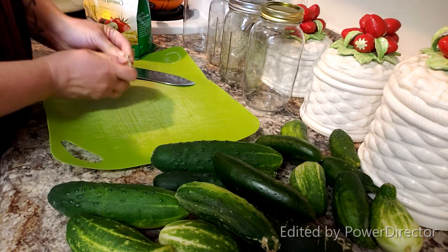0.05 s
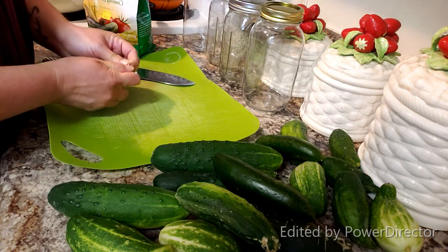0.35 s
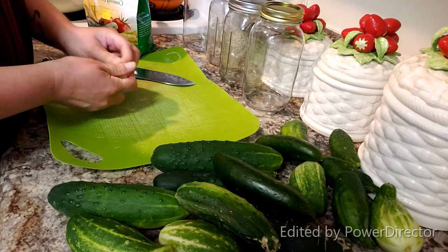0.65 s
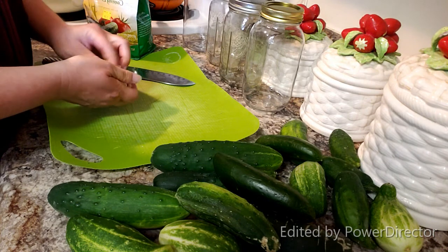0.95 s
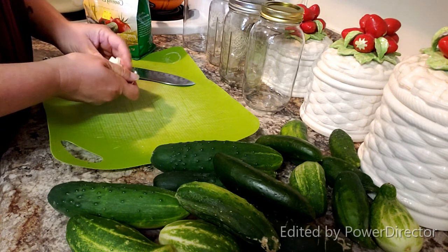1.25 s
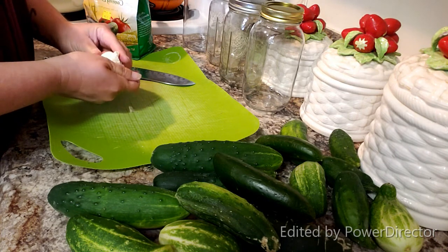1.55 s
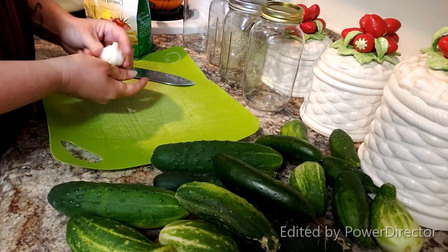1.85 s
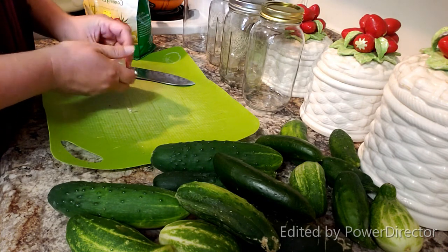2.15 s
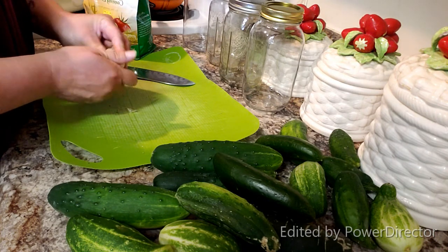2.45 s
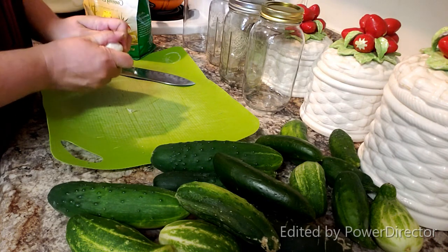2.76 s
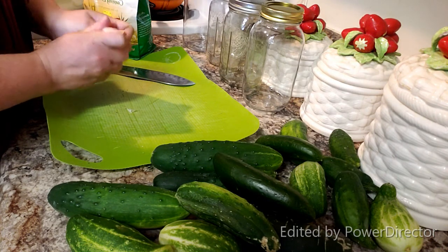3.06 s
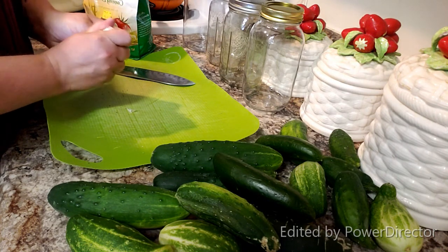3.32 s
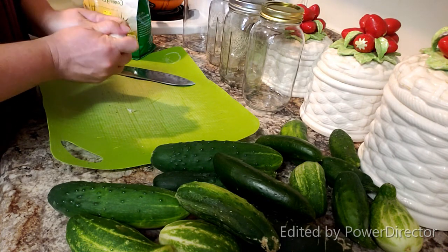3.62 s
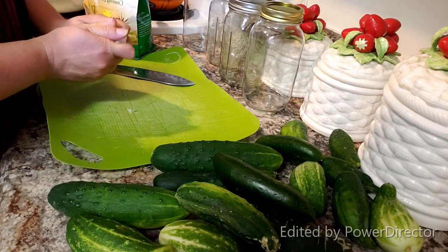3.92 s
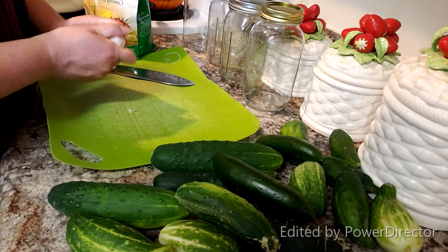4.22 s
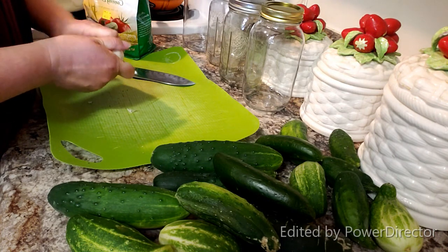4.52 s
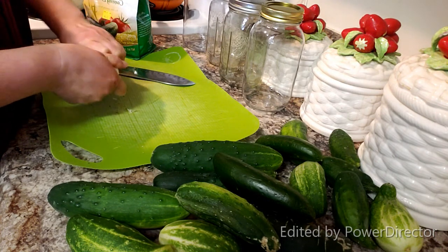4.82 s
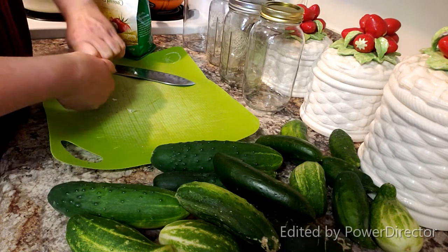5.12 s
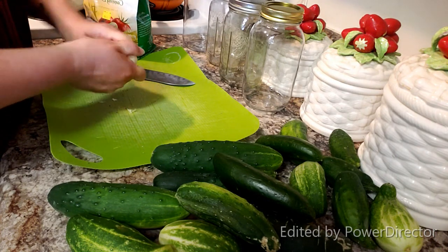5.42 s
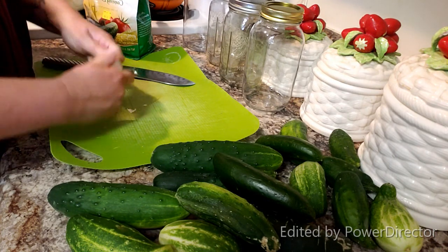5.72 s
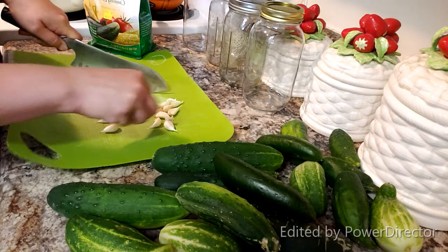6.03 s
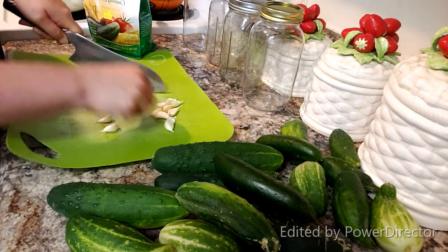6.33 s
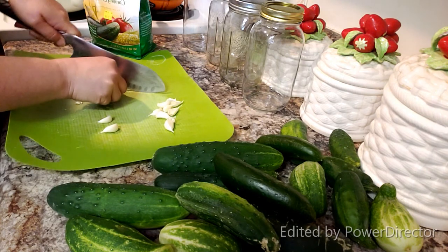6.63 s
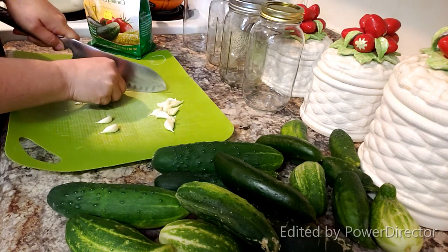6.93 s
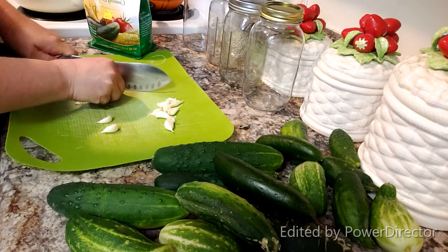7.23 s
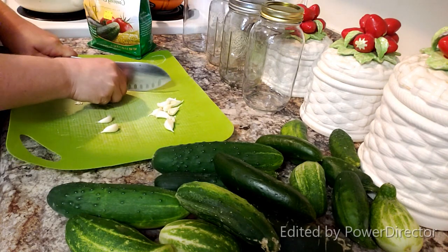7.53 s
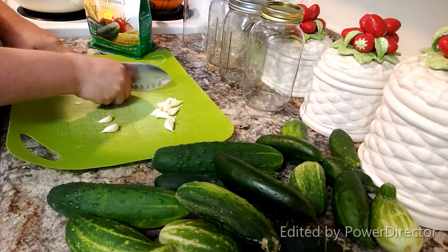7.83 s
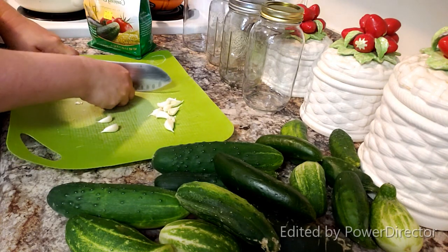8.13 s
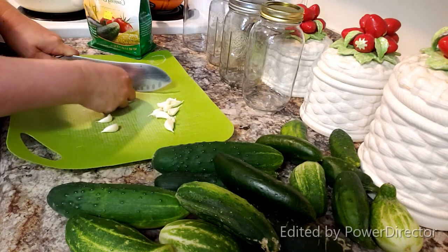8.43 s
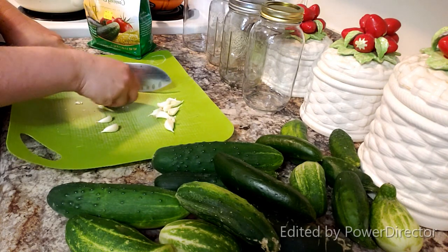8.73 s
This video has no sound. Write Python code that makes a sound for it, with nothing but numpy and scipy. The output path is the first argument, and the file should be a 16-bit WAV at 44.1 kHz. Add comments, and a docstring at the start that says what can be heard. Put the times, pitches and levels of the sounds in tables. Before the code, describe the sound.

From the start, fingers peel garlic close to the microphone: a dry, high, papery crackle with short tears and many tiny sharp snaps. It is liveliest in the first three seconds, with stronger cracks right at the beginning, around 1.4 seconds and near 2.6 and 3.2 seconds. From about 3 to 5.5 seconds, fingertips rasp lightly on the husk while the rustling grows softer and sparser, stopping at 6 seconds. A knife taps and scrapes faintly on a plastic cutting board around 6.4 seconds. At 7.3 seconds it crunches through a clove and hits the board with a firm, dry knock, the loudest moment, with a slight low thud from the counter. Quiet, crisp slicing follows from about 7.9 to 8.5 seconds, then a lighter cluster of knocks near 8.6 seconds. A faint, low, steady hum fills the small kitchen throughout, and the echo is short.

```python
"""Dry garlic skin rustles, tears and snaps as it is peeled by hand in a small kitchen.
Each tiny break is a click, coloured by its own flake and the thicker layers beneath; fingertips rasp
on the husk. Then a knife crunches through a clove in swells of dense grains and knocks on a thin
plastic board, which rings briefly on its stone counter. A low hum fills the room underneath."""
import sys
import numpy as np
from scipy import signal
from scipy.fft import rfft, irfft, next_fast_len
from scipy.io import wavfile
from scipy.ndimage import uniform_filter1d

SR = 44100
rng = np.random.default_rng(int(sys.argv[2]) if len(sys.argv) > 2 else 0)


def dump(signal):
    """Clip the signal to [-1, 1] and save it as 16-bit WAV at the path in sys.argv[1]."""
    limited = np.clip(np.atleast_2d(signal).T, -1, 1)
    pcm = np.round(limited * 32767).astype(np.int16)
    wavfile.write(sys.argv[1], SR, pcm)


N = 395577
TIME = np.arange(N) / SR

# room tail under the knife: (frequency [Hz], t60 [s])
ROOM_DECAY = [(200, 0.51), (1400, 0.35), (3700, 0.16), (9700, 0.34)]
# stereo image of diffuse sound: (frequency [Hz], left-right correlation [0..1])
STEREO_LIKENESS = [(60, 0.93), (300, 0.89), (600, 0.63), (1200, 0.12), (2500, 0.069)]
# EQ of the left microphone, mirrored on the right: (frequency [Hz], gain [dB])
LEFT_MIC_EQ = [(70, -2.5), (250, 0.2), (4000, 0.17), (8000, -0.77), (14000, -2.0)]
# tone of the noise bed: (frequency [Hz], relative level [dB])
HUM_EQ = [(25, -19), (62, -7), (120, -15.5), (215, -26.5), (335, -16), (480, -19.5), (700, -25),
          (1050, -37), (2000, -38.5), (5000, -45.5), (9500, -47.5), (15000, -40.5)]
# narrow resonances in the hum: (frequency [Hz], width [Hz], level [dB])
HUM_DRONES = [(60.8, 11, -69), (342.8, 19.7, -75.5), (382.4, 8.9, -76.5)]
# faint hollow tones swelling in the hum: (time [s], half length [s], frequency [Hz], level [dB])
HUM_SWELLS = [(3.9, 0.7, 545, -74), (7.56, 0.29, 434, -65.5), (8.352, 0.21, 425, -64.5)]
# modes of the board on the counter: (frequency [Hz], gain [dB], t60 [s])
BOARD_MODES = [(214, -0.5, 0.14), (290, -5.5, 0.14), (365, -6.5, 0.087), (447, -11, 0.078),
               (497, -8.5, 0.075), (632, -10.5, 0.042), (726, -5.5, 0.043), (817, -11.5, 0.053),
               (920, -7.5, 0.051), (1364, -11.5, 0.093), (1748, -10.5, 0.1)]
# modes of the counter under the heaviest blow: (frequency [Hz], level [dB], t60 [s])
COUNTER_MODES = [(53.4, -45, 0.66), (95.5, -47.5, 0.62)]
# blade hits board: (time [s], level [dB], low cut from the spot [Hz], high cut from the contact [Hz])
BLADE_KNOCKS = [(6.316, -51, 400, 3800), (6.3291, -45.5, 603, 6500), (6.394, -42.5, 2200, 4150),
                (7.264, -15.5, 275, 680), (7.2695, -18.5, 650, 1090), (7.3025, -36, 600, 3000),
                (7.318, -30, 910, 4500), (7.3235, -23, 590, 1180), (8.593, -34.5, 1270, 4330),
                (8.6013, -28.5, 820, 2600), (8.6085, -31.5, 537, 950), (8.642, -40.5, 924, 5040),
                (8.667, -39, 268, 3630)]
# slices and scrapes: (peak time [s], rise [s], fall [s], level [dB], low cut [Hz], high cut [Hz])
BLADE_STROKES = [(6.405, 0.03, 0.031, -50.5, 774, 3870), (6.676, 0.018, 0.025, -70, 4970, 13000),
                 (7.264, 0.015, 0.028, -48.5, 910, 14100), (7.28, 0.017, 0.044, -42.5, 680, 2350),
                 (7.317, 0.00077, 0.019, -37, 910, 4800), (7.319, 0.0037, 0.0091, -36.5, 5050, 15500),
                 (7.87, 0.033, 0.066, -65, 573, 1060), (7.98, 0.032, 0.018, -56, 550, 1150),
                 (7.979, 0.019, 0.02, -63, 3970, 14100), (8.249, 0.025, 0.095, -61, 6100, 14800),
                 (8.34, .002, 0.046, -54, 5500, 6460), (8.368, 0.019, 0.019, -48, 2140, 15800),
                 (8.493, 0.019, 0.012, -50.5, 2060, 14000), (8.602, 0.013, 0.0061, -48, 3950, 14000),
                 (8.67, 0.038, 0.038, -52, 1280, 3500)]
# fingertip slips on the husk: (time [s], half length [s], level [dB])
HUSK_SCRATCHES = [(2.979, 0.013, -49.5), (3.089, 0.06, -51.5), (4.082, 0.12, -61), (4.426, 0.032, -57.5),
                  (4.661, 0.33, -66), (4.916, 0.034, -56), (5.132, 0.12, -59), (5.458, 0.082, -55.5)]
# fingers turning the clove: (time [s], level [dB], send to thick layers [dB])
RUBBING_CURVE = [(0.0, -43.5, -7), (0.38, -40, -17), (0.5, -51.5, -16), (0.63, -41, -11.5),
                 (0.68, -50.5, -10), (0.8, -43.5, -12.5), (1.3, -42.5, -8.5), (1.7, -37, -7.5),
                 (2.002, -37.5, -8), (2.14, -54, -4.5), (2.21, -39, -17), (2.33, -44.5, -15),
                 (2.55, -38, -17.5), (3.0, -43.5, -17), (3.351, -50.5, -21), (3.6, -45, -10),
                 (4.2, -45, -14.5), (4.42, -51, -7), (4.49, -58.5, -11), (4.67, -48.5, -18),
                 (5.1, -51, -22), (5.32, -59, -16), (5.56, -44.5, -13), (5.92, -59, -13),
                 (6.04, -55.5, -15)]
# strips of skin: (start [s], length [s], level [dB], flake pitch [Hz], send to thick layers [dB])
SKIN_PULLS = [(-0.017, 0.087, -29.5, 8400, -4.5), (0.18, 0.096, -34.5, 10700, -13.5),
              (0.713, 0.057, -35.5, 9900, -27), (0.91, 0.058, -37, 11100, -4),
              (1.202, 0.032, -35.5, 11000, -13), (1.34, 0.07, -32, 10900, -7.5),
              (1.381, 0.074, -26.5, 2420, -9), (1.601, 0.038, -33.5, 8900, -17),
              (2.204, 0.05, -34, 12400, -18), (2.582, 0.07, -31.5, 12200, -21),
              (2.626, 0.048, -27, 12200, -16.5), (2.81, 0.13, -38, 15400, -17),
              (3.058, 0.16, -34.5, 12500, -18), (3.161, 0.089, -31.5, 9900, -9),
              (3.378, 0.037, -43.5, 8750, -30), (3.485, 0.11, -41, 14500, -27),
              (3.799, 0.12, -42.5, 10000, -10.5), (3.98, 0.1, -39.5, 11200, -13),
              (4.289, 0.041, -42.5, 8200, -15), (4.87, 0.048, -48, 6700, -19),
              (4.987, 0.032, -44, 6300, -18), (5.155, 0.064, -46.5, 6600, -25),
              (5.405, 0.11, -41, 9200, -17), (5.636, 0.11, -40.5, 10800, -14.5),
              (5.767, 0.087, -43.5, 10000, -11.5)]
# brittle cracks, plus one soft dull click as the scene changes: (time [s], level [dB], pitch [Hz])
SNAP_HITS = [(0.0186, -36, 2300), (0.063, -22.5, 8300), (0.079, -24, 6800), (0.221, -28, 13300),
             (0.287, -26, 8300), (0.3298, -32, 10500), (0.4735, -34, 9800), (0.5796, -36, 10600),
             (0.597, -36, 12000), (0.7003, -36, 11800), (1.015, -35, 11500), (1.203, -34, 13000),
             (1.3538, -23.5, 2430), (1.4018, -25.5, 9900), (1.4301, -23.5, 10000), (1.4956, -33.5, 12800),
             (1.542, -32, 14300), (1.6017, -27.5, 3220), (1.642, -29, 2380), (1.762, -33, 12000),
             (1.8091, -35, 11400), (1.934, -33, 9600), (1.982, -27, 11800), (1.9977, -31, 13000),
             (2.071, -33, 13100), (2.166, -37.5, 13600), (2.381, -37.5, 12500), (2.433, -38, 14000),
             (2.763, -35, 6450), (2.833, -32, 4800), (2.85, -32.5, 13500), (3.03, -36.5, 9600),
             (3.073, -33, 12500), (3.177, -27.5, 8700), (3.414, -40.5, 6740), (3.532, -35.5, 13000),
             (3.7138, -37.5, 10900), (3.845, -41, 9000), (3.934, -32.5, 8800), (4.1414, -34, 8700),
             (4.391, -40.5, 6860), (4.5286, -35.5, 4100), (4.563, -35.5, 7200), (4.879, -44.5, 9000),
             (4.9835, -39.5, 11700), (5.2003, -41, 4100), (5.3927, -40, 8200), (5.837, -38.5, 10500),
             (6.043, -49.5, 1700), (8.3355, -34, 13400), (8.4612, -43.5, 12600), (8.4997, -42.5, 6860)]
# tone of the thin skin: (frequency [Hz], gain [dB])
THIN_SKIN_EQ = [(500, -44.5), (1160.0, -26), (1900, -8), (2300, 0), (3460.0, 0), (4600.0, 2.5),
                (6220.0, 3.5), (8540.0, -5), (11400.0, -0.06), (14420.0, 2)]
# tone of the thick layers: (frequency [Hz], gain [dB])
THICK_SKIN_EQ = [(200, -28.5), (500, -14), (900, -7), (1300, -7), (1900, -3.5), (2700, 1.5), (3800, -0.5),
                 (7000, -39)]


def from_db(db):
    """Decibels to gain."""
    return 10 ** (np.asarray(db) / 20)


def rms_one(x):
    """Scale to rms 1."""
    return x / np.sqrt(np.mean(x ** 2) + 1e-20)


def at_hz(points, hz):
    """Read a curve on a log-frequency axis."""
    f, value = np.transpose(points)
    return np.interp(np.log(hz + 1e-9), np.log(f), value)


def add(out, s, sound):
    """Mix a sound into the stereo bus at time s."""
    start = int(s * SR)
    out[:, start:start + sound.shape[1]] += sound[:, :N - start]


def band(x, low_hz, high_hz, order=2):
    """Butterworth band-pass."""
    return signal.sosfilt(signal.butter(order, [low_hz, high_hz], "band", fs=SR, output="sos"), x + 1e-18)


def colour(x, eq, size=4096):
    """Minimum-phase EQ: follows the curve with no pre-ring."""
    gains = from_db(at_hz(eq, np.arange(size // 2 + 1) * SR / size))
    cepstrum = irfft(np.log(gains))
    cepstrum[1:size // 2] *= 2
    cepstrum[size // 2 + 1:] = 0
    impulse = irfft(np.exp(rfft(cepstrum)))
    return signal.oaconvolve(np.atleast_2d(x), impulse[None], axes=1)[:, :N]


def ring(force, modes):
    """A struck body: each click sets one decaying sine ringing per mode."""
    out = 0
    for hz, db, t60 in modes:
        r, w = 10 ** (-3 / (t60 * SR)), 2 * np.pi * hz / SR
        out += from_db(db) * signal.lfilter([0, np.sin(w)], [1, -2 * r * np.cos(w), r * r], force + 1e-18)
    return out


def fractures(per_s, spread_db, size=N):
    """Tiny breaks as random clicks: many small, a few large."""
    heights = from_db(spread_db * np.minimum(rng.exponential(1, size), 4))
    return (rng.random(size) < per_s / SR) * heights * rng.choice([-1, 1], size)


def diffuse(length):
    """Stereo white noise, centred in the bass and wide in the treble."""
    mid, side = rfft(rng.standard_normal((2, 2 * next_fast_len(length // 2 + 1))))
    alike = at_hz(STEREO_LIKENESS, np.linspace(0, SR / 2, len(mid)))
    pair = np.sqrt(1 + alike) * mid + np.sqrt(1 - alike) * side * [[1], [-1]]
    return irfft(pair)[:, :length] / np.sqrt(2)


def linger(power, t60):
    """Spread energy over an exponential decay."""
    r = 10 ** (-6 / (t60 * SR))
    return signal.lfilter([1 - r], [1, -r], power + 1e-24)


def kitchen(x, near_db, near_t60, room_db, room_t60):
    """Direct sound, scatter off counter and jars, then the room's tail; total power is kept."""
    near, room = from_db(near_db) ** 2, from_db(room_db) ** 2
    scatter = linger(x ** 2, near_t60)
    reflected_power = near * scatter + room * linger(scatter, room_t60)
    direct = np.array([x, np.pad(x, (5, 0))[:len(x)]])   # left ear first
    # every contact has its own place, so its reflections never repeat
    return (direct + np.sqrt(reflected_power) * diffuse(len(x))) / np.sqrt(1 + near + room)


def hum(bed_db=-66):
    """Room tone: a steady noise bed with narrow resonances; faint tones come and go in it."""
    bed = rms_one(colour(diffuse(N), HUM_EQ))
    white = rng.standard_normal(N)
    tones = np.zeros(N)
    for hz, width, db in HUM_DRONES:
        tones += from_db(db) * rms_one(band(white, hz - width / 2, hz + width / 2))
    for s, half, hz, db in HUM_SWELLS:
        swell = np.exp(-((TIME - s) / half) ** 2)
        tones += from_db(db) * swell * rms_one(band(white, hz - 25, hz + 25))
    return from_db(bed_db) * bed + tones


def knife_knocks(clack_db=31.5):
    """Each blow gives a dry clack and rings the board's damped modes; the heaviest shakes the counter."""
    force, blow = np.zeros((2, N)), signal.unit_impulse(SR // 2)
    for s, db, low_hz, high_hz in BLADE_KNOCKS:
        tail_s = at_hz(ROOM_DECAY, np.sqrt(low_hz * high_hz))
        heard = kitchen(blow, near_db=-4, near_t60=.09, room_db=-11, room_t60=tail_s)
        add(force, s, from_db(db) * band(heard, low_hz, high_hz, order=3))
    board = ring(force, BOARD_MODES) + from_db(clack_db) * force
    out = band(board, low_hz=255, high_hz=15000, order=4)
    heaviest_s = max(BLADE_KNOCKS, key=lambda knock: knock[1])[0]
    add(out, heaviest_s, ring(blow, COUNTER_MODES)[None])
    return out


def knife_strokes(cells_per_s=5000, trim_db=.5):
    """The edge bursts cells and rubs the plastic: dense grains under a quick swell."""
    grains, out = fractures(cells_per_s, spread_db=5.5), np.zeros((2, N))
    for s, rise, fall, db, low_hz, high_hz in BLADE_STROKES:
        span = slice(int((s - .15) * SR), int((s + .4) * SR))
        swell = np.exp(np.minimum((TIME[span] - s) / rise, (s - TIME[span]) / fall))
        makeup = np.sqrt(SR / 2 / (high_hz - low_hz))   # for the power lost in the band-pass
        burst = from_db(db + trim_db) * swell * rms_one(grains[span]) * makeup
        tail_s = at_hz(ROOM_DECAY, np.sqrt(low_hz * high_hz))
        heard = kitchen(burst, near_db=9, near_t60=.024, room_db=1, room_t60=tail_s)
        add(out, span.start / SR, band(heard, low_hz, high_hz))
    return out


def crackle(db, envelope, breaks_per_s=1150, reference_db=-47):
    """Dry fibres breaking: harder pulling makes the crackle both louder and denser."""
    density = breaks_per_s * from_db(.45 * (db - reference_db))
    clicks = fractures(density, spread_db=3.1, size=len(envelope))
    # ride the level over about 30 ms, keeping the grain
    power = np.maximum(uniform_filter1d(clicks ** 2, 1300), 0) + np.mean(clicks ** 2) / 1000
    shaped = from_db(db) * envelope * clicks / np.sqrt(power)
    return kitchen(shaped, near_db=-1, near_t60=.022, room_db=-6.5, room_t60=.2)


def scratches(centre_hz=3130, width_hz=1200):
    """Slips of a fingertip rasp over the husk, whose broad hollow shifts a little with every grip."""
    out, t = np.zeros((2, N)), TIME[:SR // 2] - .2
    makeup = np.sqrt(SR / 2 / width_hz)
    for s, half, db in HUSK_SCRATCHES:
        hz = centre_hz * rng.uniform(.93, 1.07)
        rasp = makeup * crackle(db, np.exp(-(t / half) ** 2))
        add(out, s + t[0], band(rasp, hz - width_hz / 2, hz + width_hz / 2))
    return out


def rubbing(flake_hz=12400, slip_db=2, slips_per_s=120, end_s=6.05):
    """Loose skin catches and slips unevenly under the fingers until the peeling stops."""
    s, db, thick_send_db = np.transpose(RUBBING_CURVE)
    knots = rng.standard_normal(4096)
    slips = rms_one(np.interp(TIME * slips_per_s, np.arange(len(knots)), knots))
    envelope = (TIME < end_s) * from_db(slip_db * np.minimum(slips, 2))
    return 0, crackle(np.interp(TIME, s, db), envelope), flake_hz, np.interp(TIME, s, thick_send_db)


def pulls(attack_s=.013, release_s=.012):
    """Each pull tightens, holds and lets go of one piece of skin."""
    for s, length, db, flake_hz, thick_send_db in SKIN_PULLS:
        start = max(s, 0)
        t = TIME[int(start * SR):int((s + length + .2) * SR)] - s
        envelope = np.clip(t / attack_s, 0, 1) * np.exp(-np.maximum(t - length, 0) / release_s)
        yield start, crackle(db, envelope), flake_hz, thick_send_db


def snaps(run_gain=.35, run_s=.004, thick_send_db=-17):
    """A crack is one sharp break running on for a few ms in smaller ones; the dull click has this shape."""
    t = TIME[:SR // 5]
    for s, db, hz in SNAP_HITS:
        crack = run_gain * np.exp(-t / run_s) * rng.laplace(0, 1, len(t))
        crack[0] = 1
        crack *= from_db(db) / np.std(crack[:SR // 100])   # the first 10 ms set the level
        heard = kitchen(crack, near_db=-1, near_t60=.045, room_db=-5, room_t60=.23)
        yield s, heard, hz, thick_send_db


def crumple(x, wander_db, ring_db, q, count, hop=4096):
    """The flakes bend: about every tenth of a second a new set of resonances fades in over the last."""
    fft_size, out = 4 * hop, np.zeros_like(x)
    f = np.arange(1, 2 * hop + 2) * SR / fft_size
    fade = signal.get_window("hann", 2 * hop)
    for i in range(-hop, N, hop):
        positions = (np.arange(count) + rng.random(count)) / count
        hz = 2000 * 7.5 ** positions[:, None]   # scattered from 2 to 15 kHz
        gains = from_db(ring_db + wander_db * np.minimum(rng.standard_normal((count, 1)), 2))
        response = 1 + np.sum(gains / (1 + 1j * q * (f / hz - hz / f)), axis=0)
        start = max(i, 0)
        piece = x[:, start:i + 2 * hop] * fade[start - i:N - i]
        out[:, start:start + fft_size] += irfft(rfft(piece, fft_size) * response)[:, :N - start]
    return out


def garlic_skin(thin_db=-5, thick_db=-3.5, flake_q=1.36):
    """Every break sounds at the broad pitch of its own flake, and less in the thick layers beneath."""
    thin, thick = np.zeros((2, 2, N))
    for s, breaks, flake_hz, thick_send_db in [*snaps(), *pulls(), rubbing()]:
        flake = signal.iirpeak(flake_hz, flake_q, fs=SR)
        add(thin, s, signal.lfilter(*flake, breaks + 1e-18))
        add(thick, s, from_db(thick_send_db) * breaks)
    rustle = from_db(thin_db) * colour(thin, THIN_SKIN_EQ)
    rustle += from_db(thick_db) * colour(thick, THICK_SKIN_EQ)
    # large limp flakes colour the rustle broadly, small stiff ones ring
    rustle = crumple(rustle, wander_db=5, ring_db=-8.5, q=6, count=8)
    return crumple(rustle + scratches(), wander_db=7.5, ring_db=-7.5, q=70, count=22)


def scene():
    """The mix: skin, knife and board over the kitchen's hum."""
    return garlic_skin() + knife_strokes() + knife_knocks() + hum()


def record(dry):
    """Two microphones with mirrored EQ, then a steep high cut."""
    right_eq = [(hz, -db) for hz, db in LEFT_MIC_EQ]
    pair = np.vstack([colour(dry[0], LEFT_MIC_EQ), colour(dry[1], right_eq)])
    high_cut = signal.ellip(10, .2, 70, 16100, fs=SR, output="sos")
    return signal.sosfilt(high_cut, pair)


dry = scene()
out = record(dry)
dump(out)
```